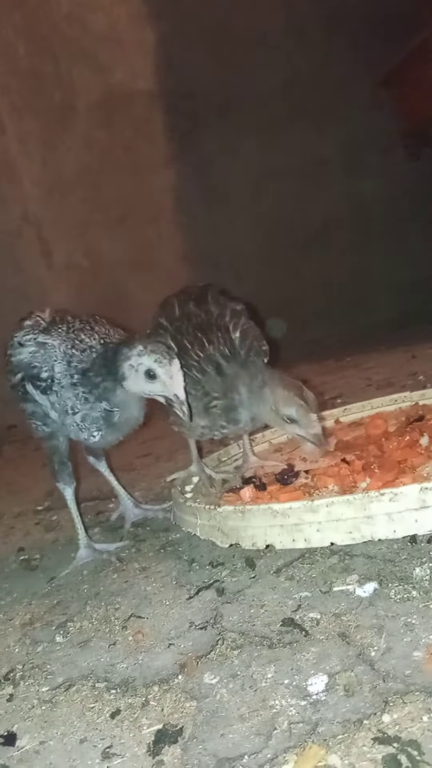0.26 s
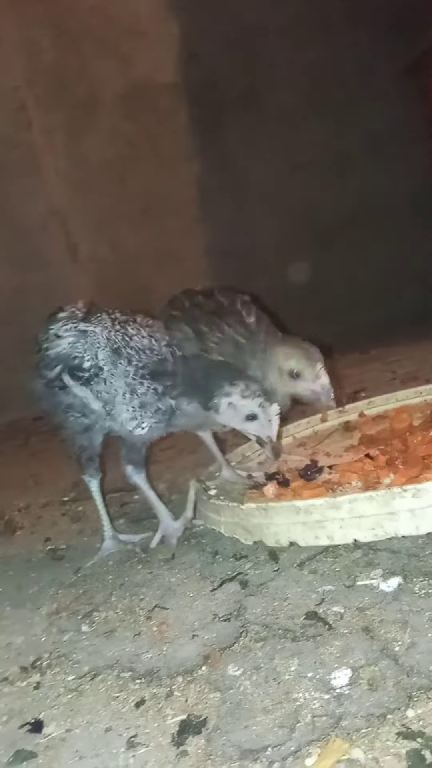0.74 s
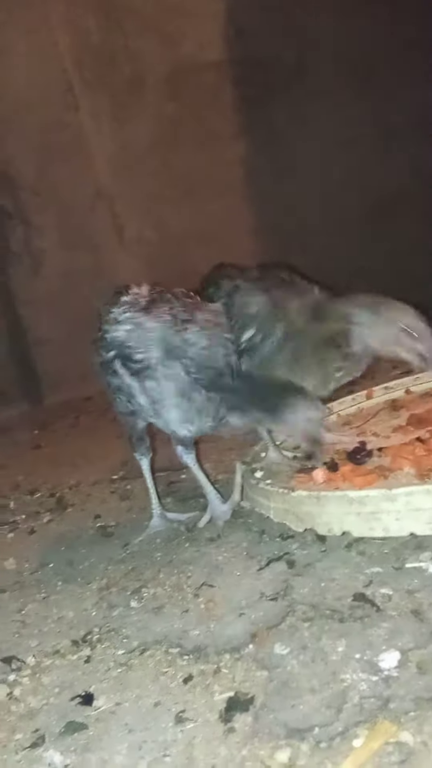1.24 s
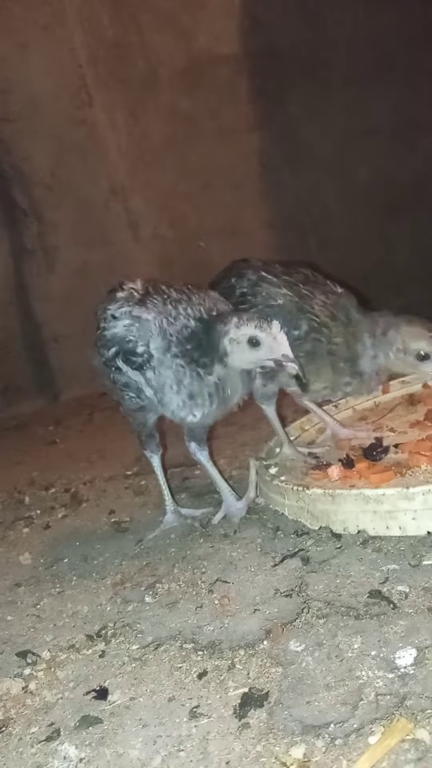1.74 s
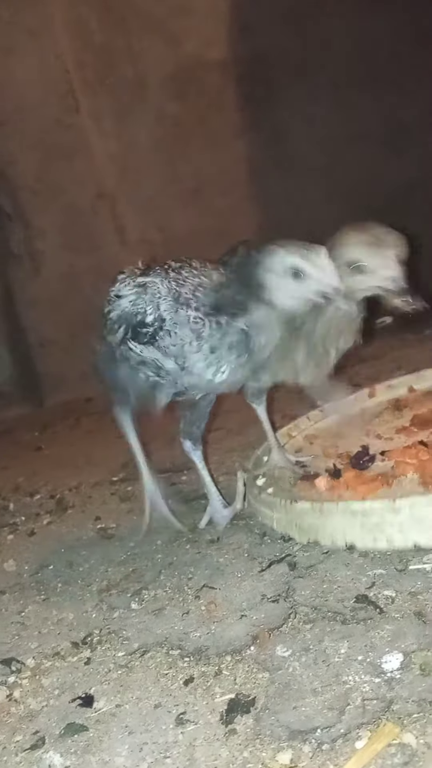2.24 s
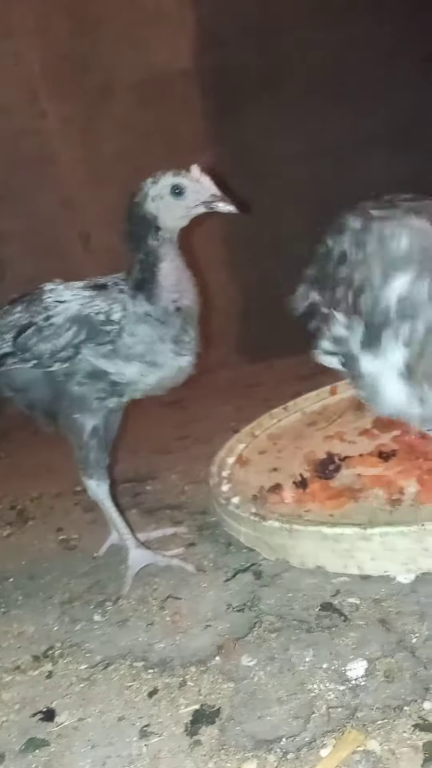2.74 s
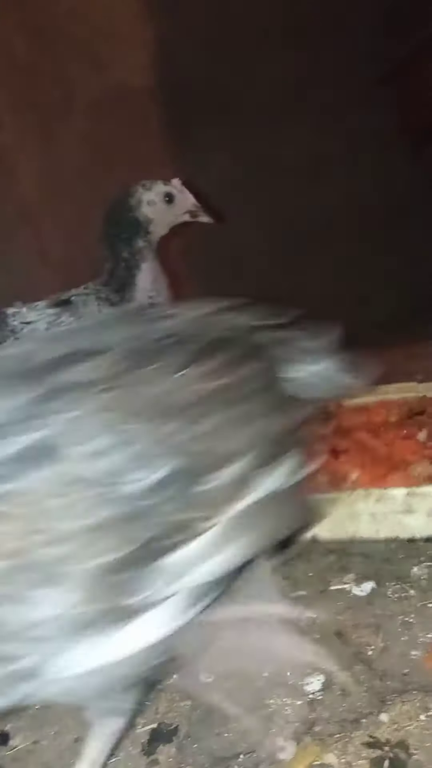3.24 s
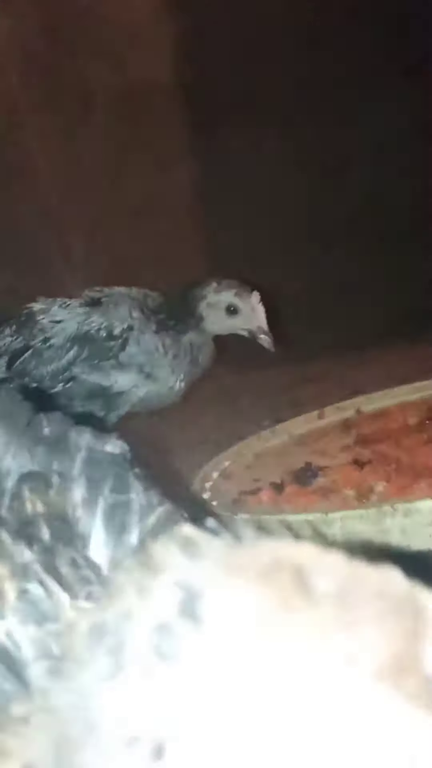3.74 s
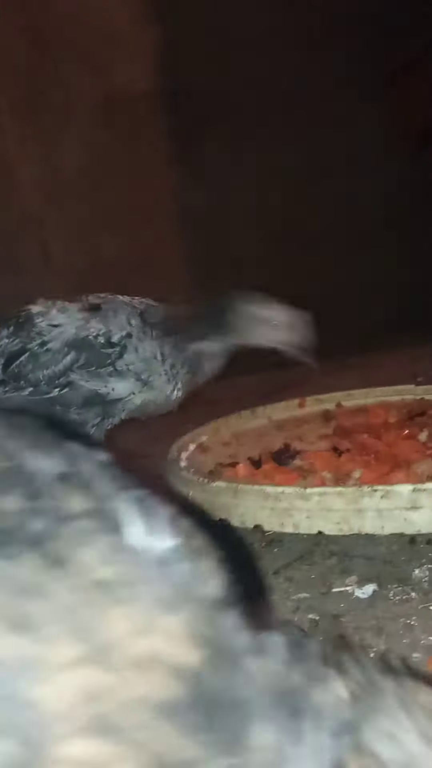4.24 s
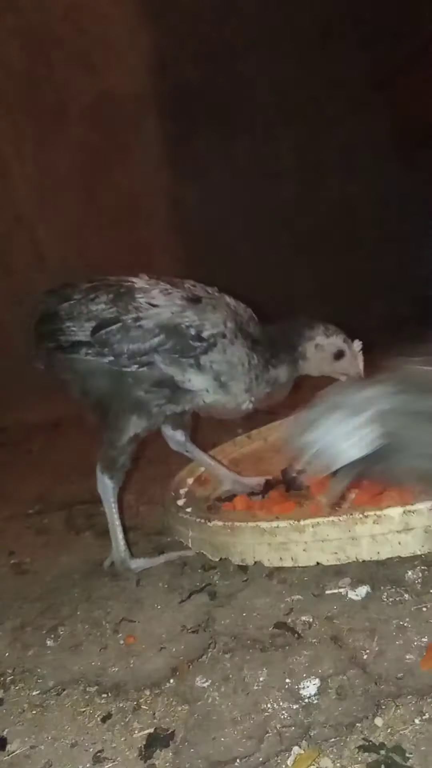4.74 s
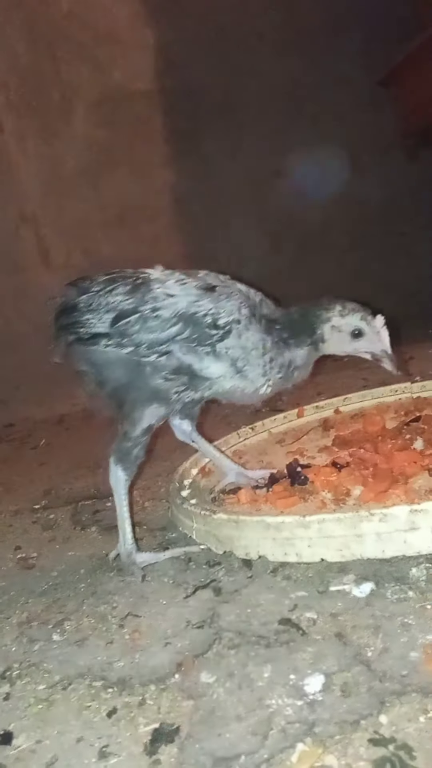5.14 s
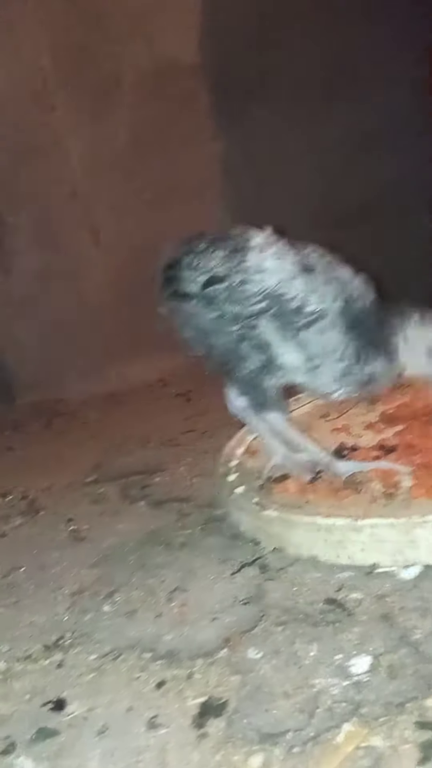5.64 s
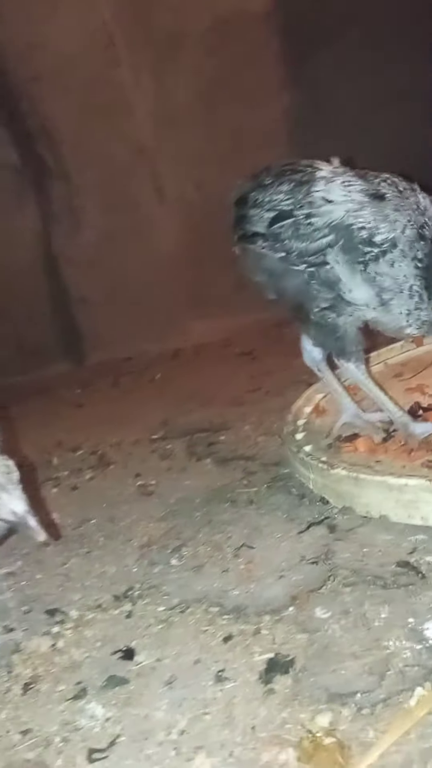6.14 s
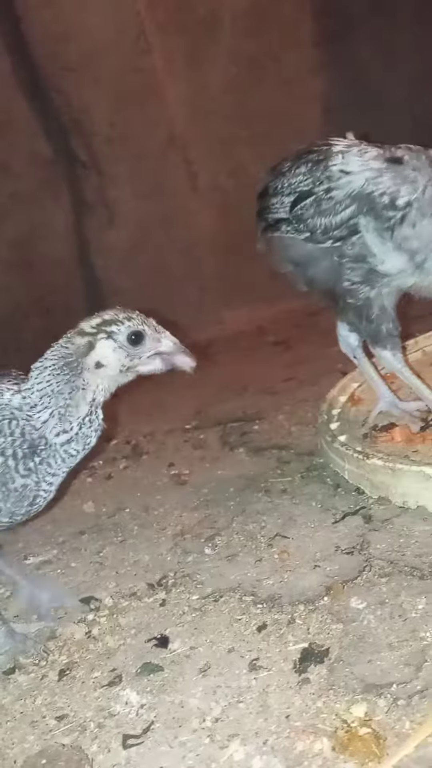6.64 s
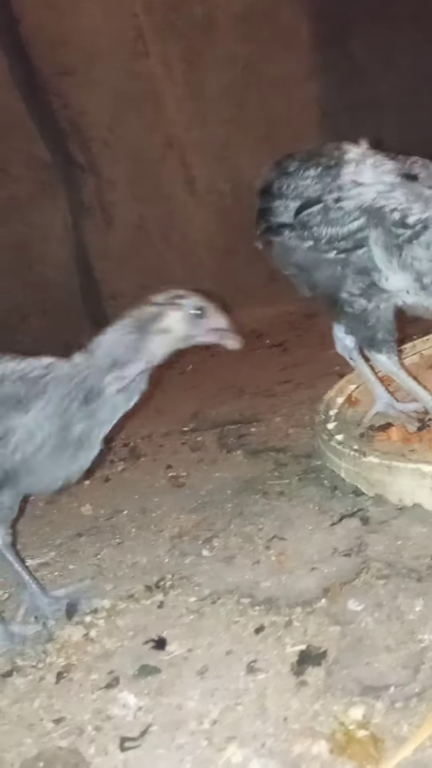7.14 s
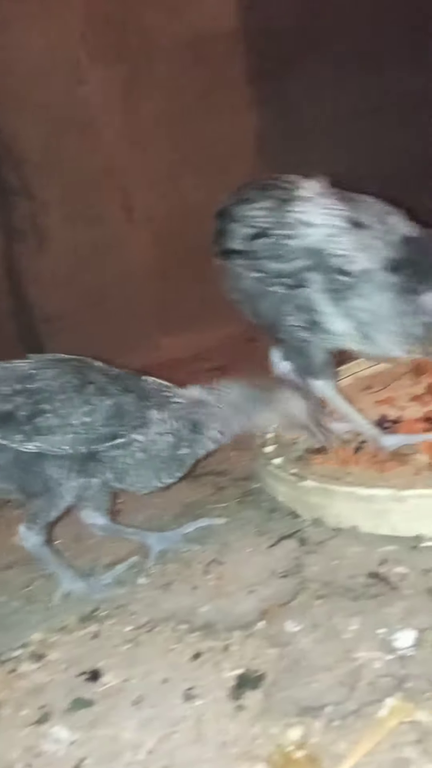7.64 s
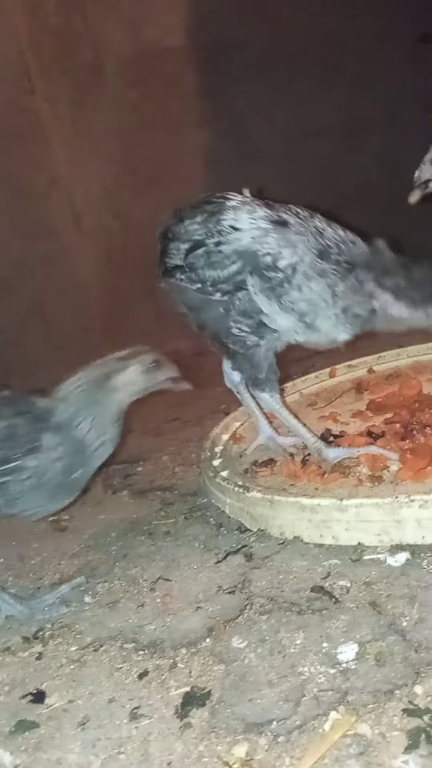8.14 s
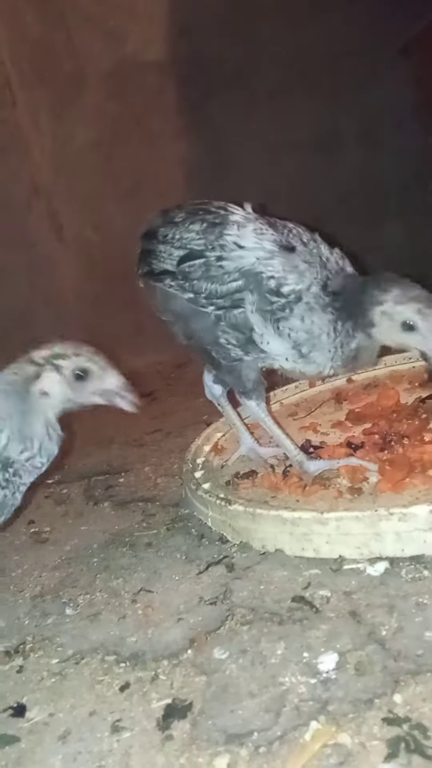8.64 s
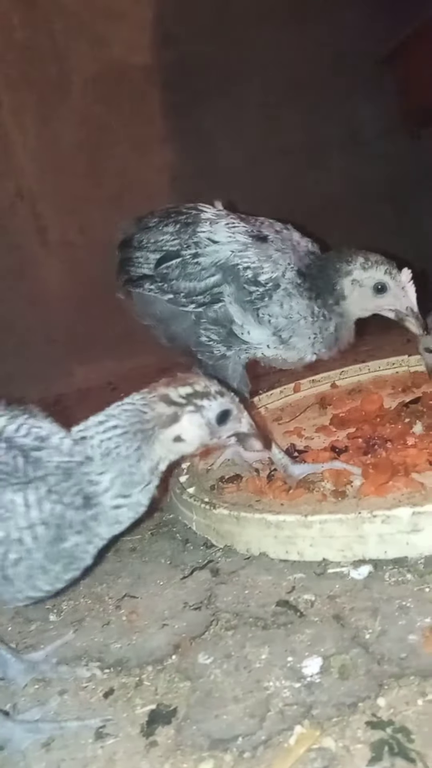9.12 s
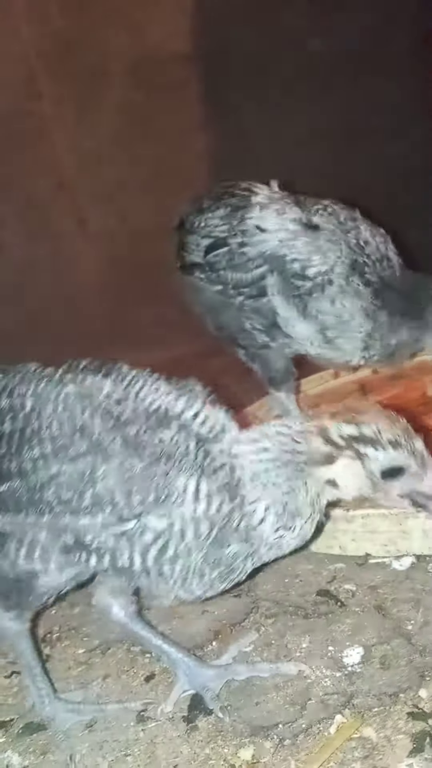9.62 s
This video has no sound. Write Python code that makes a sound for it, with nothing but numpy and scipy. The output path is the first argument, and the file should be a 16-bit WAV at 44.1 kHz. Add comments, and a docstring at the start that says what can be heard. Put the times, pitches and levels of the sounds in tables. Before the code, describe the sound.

Young chicks peep in short falling chirps and low sliding whistles while beaks and feet knock and scuff around a feed dish in a small coop.

```python
"""Faint air noise and patter open the scene, with soft scuffing, a sliding whistle and chicks' falling peeps.
Young chicks feed from a dish in a small bare coop; near and farther birds whistle mostly low, sliding notes.
Calls are phase-modulated sines with weak overtones; knocks are damped resonances plus noise cracks.
Grit ticks are short noise bursts; scuffs and rustles are random grains. A low hum comes and goes, two
squawks rasp, and close walls echo all but the hum and air."""
import sys
import numpy as np
from scipy import signal
from scipy.fft import rfft, irfft, next_fast_len
from scipy.io import wavfile

SR = 44100
rng = np.random.default_rng(int(sys.argv[2]) if len(sys.argv) > 2 else 0)


def output_pcm(signal):
    """Save a mono or channel-first signal as 16-bit PCM at the path in sys.argv[1].

    Samples are clipped to [-1, 1] before scaling.
    """
    pcm = np.clip(np.atleast_2d(signal).T, -1, 1) * 32767
    wavfile.write(sys.argv[1], SR, np.round(pcm).astype(np.int16))


N = 435708


def from_db(db):
    """Decibels to gain."""
    return 10 ** (np.asarray(db) / 20)


def rms_one(x):
    """Scale to unit power."""
    return x / np.sqrt(np.mean(x ** 2) + 1e-20)


def at_hz(points, hz):
    """Read a (Hz, value) curve on a log-frequency axis."""
    point_hz, values = np.transpose(points)
    return np.interp(np.log(hz), np.log(point_hz), values)


def add(out, start_s, sound):
    """Mix a sound in at start_s, cut at the end."""
    i = max(int(start_s * SR), 0)
    out[i:i + len(sound)] += sound[:max(N - i, 0)]


def drift(rate_hz, size):
    """Zero-mean random curve: unit-spread normal points at rate_hz, joined by straight lines."""
    steps = np.arange(size) * rate_hz / SR
    return np.interp(steps, np.arange(size), rng.standard_normal(size))


def band(x, low_hz, high_hz, order=2):
    """Causal band-pass."""
    sos = signal.butter(order, [low_hz, high_hz], "band", fs=SR, output="sos")
    return signal.sosfilt(sos, x)


def colour(x, spectrum):
    """Give a noise a spectrum; unit power."""
    size = next_fast_len(N)
    hz = np.arange(size // 2 + 1) * SR / size + 1
    shaped = rfft(x, size) * from_db(at_hz(spectrum, hz))
    return rms_one(irfft(shaped, size)[:N])


def ring(t, hz, t60_s):
    """A struck, damped resonance."""
    return np.sin(2 * np.pi * hz * t) * from_db(-60 * t / t60_s)


def note(hz, level_db, swell_db, waver, flutter_db, attack_s, release_s):
    """Phase and loudness of one syrinx note: pitch wavers, level flutters and swells or fades."""
    size = len(hz)
    t = np.arange(size) / SR
    phase = 2 * np.pi * np.cumsum(hz * (1 + waver * drift(220, size))) / SR
    gate = np.sin(np.pi / 2 * np.clip(np.minimum(t / attack_s, t[::-1] / release_s), 0, 1))
    swell = swell_db * np.interp(t / t[-1], [.3, .8], [-.5, .5])
    return phase, gate * from_db(level_db + swell + flutter_db * drift(120, size))


ORDINARY_DB, NEAR_DRYNESS_DB_PER_DB = -52, 0.75


def wall_share(level_db):
    """Calls louder than ordinary come from closer by, so less reaches the walls."""
    return from_db(-NEAR_DRYNESS_DB_PER_DB * max(level_db - ORDINARY_DB, 0))


# background air spectrum: (frequency [Hz], relative level [dB])
AIR_SPECTRUM = [(20, -16), (55, 6.5), (90, 6), (200, 0.5), (600, -5.5), (1400, -11.5), (3000, -19),
                (6000, -22.5), (10000, -18), (16000, -31)]
AIR_DB = -85


def air():
    """Steady noise, strongest in the bass."""
    return from_db(AIR_DB) * colour(rng.standard_normal(N), AIR_SPECTRUM)


def grains(per_s, spread_db, smooth):
    """Random contacts of uneven size over a rubbing hiss; each octave swells and fades by itself."""
    size_db = spread_db * np.minimum(rng.exponential(1, N), 3)
    sizes = from_db(size_db) * rng.choice([-1, 1], N)
    hits = rng.random(N) < per_s / SR
    contacts = rms_one(sizes * hits) + smooth * rng.standard_normal(N)
    total = np.zeros(N)
    for low_hz in 70 * 2 ** np.arange(8):
        total += band(contacts, low_hz, 2 * low_hz, order=1) * from_db(4 * drift(50, N))
    return total * from_db(3 * drift(70, N))


# colour of feet on the floor: (frequency [Hz], relative level [dB])
SCUFF_SPECTRUM = [(60, -16), (130, -2), (300, -11), (480, 2.5), (800, -4.5), (1300, -4.5), (2400, -1),
                  (4000, -27), (9000, -42)]
# colour of feathers and loose feed: (frequency [Hz], relative level [dB])
RUSTLE_SPECTRUM = [(500, -30.5), (1500, -20), (2400, -14), (4500, -8.5), (6200, -8), (9300, -12.5),
                   (13000, -20), (16000, -20)]


def patter():
    """Other birds step and nibble all the while: sparse grains, heard only off the walls."""
    steps = from_db(-85) * colour(grains(9, 3, smooth=0), SCUFF_SPECTRUM)
    nibbles = from_db(-83) * colour(grains(29, 7.0, smooth=0), RUSTLE_SPECTRUM)
    return steps + nibbles


# bouts of scrabbling: (time [s], length [s], foot scuff level [dB], feather and feed rustle level [dB])
SCRABBLE_BOUTS = [(0.01, 0.24, -76.5, -79), (0.531, 0.15, -66, -67.5), (1.234, 0.038, -59.5, -68),
                  (1.599, 0.15, -76, -70), (2.256, 0.25, -59, -71.5), (2.476, 0.04, -56, -76),
                  (2.592, 0.073, -64, -69), (2.69, 0.22, -70, -77), (2.886, 0.22, -64.5, -71),
                  (3.151, 0.42, -72.5, -77), (4.005, 0.19, -73, -104), (4.33, 0.068, -57, -51.5),
                  (4.444, 0.11, -57.5, -58.5), (4.546, 0.069, -58, -74), (4.756, 0.18, -86, -76),
                  (5.24, 0.41, -74.5, -81.5), (8.875, 0.12, -87, -74.5), (9.685, 0.18, -78.5, -81)]


def scrabble():
    """Feet scuff the floor while feathers and loose feed rustle: gated, coloured grains."""
    scuff, rustle = np.zeros(N), np.zeros(N)
    for start_s, length_s, scuff_db, rustle_db in SCRABBLE_BOUTS:
        stroke = signal.windows.tukey(int(length_s * SR), .5)
        add(scuff, start_s, stroke * from_db(scuff_db))
        add(rustle, start_s, stroke * from_db(rustle_db))
    feet = colour(grains(240, 3.5, smooth=0.75), SCUFF_SPECTRUM)
    feathers = colour(grains(370, 2.2, smooth=.7), RUSTLE_SPECTRUM)
    return scuff * feet + rustle * feathers


# sliding whistles: (time [s], length [s], first pitch [Hz], last pitch [Hz], level before the mix [dB])
WHISTLE_NOTES = [(0.056, 0.04, 3150, 3950, -62), (2.763, 0.023, 3735, 4200, -44),
                 (3.271, 0.079, 2657, 1946, -36), (3.729, 0.02, 2370, 2350, -55),
                 (4.935, 0.086, 2445, 1894, -53), (5.626, 0.11, 2450, 2117, -59.5),
                 (5.7, 0.16, 2094, 2250, -51), (5.956, 0.15, 1881, 2323, -56.5),
                 (6.524, 0.055, 2995, 3830, -60.5), (7.1, 0.092, 2970, 2022, -52.5),
                 (7.315, 0.081, 2696, 2150, -57.5), (7.428, 0.14, 2026, 2177, -54.5),
                 (7.587, 0.154, 2130, 2064, -55.5), (7.828, 0.088, 2084, 2233, -50.5),
                 (7.977, 0.097, 1693, 2030, -52), (8.157, 0.12, 1824, 2086, -57.5),
                 (8.322, 0.11, 1765, 2250, -52.5), (8.533, 0.12, 1673, 1938, -51.5),
                 (8.755, 0.14, 1746, 1862, -55), (8.986, 0.096, 1953, 2038, -51),
                 (9.246, 0.13, 1719, 1916, -50), (9.351, 0.13, 1918, 2159, -52.5),
                 (9.484, 0.13, 1948, 2117, -52.5), (9.742, 0.19, 1983, 2105, -46.5)]
WHISTLE_EASE_POWER, WHISTLE_SWELL_DB, WHISTLE_OCTAVE_DB = 1.9, 1, -30.5
RASP_RAD, RASP_DECAY_S = 0.55, 0.016


def whistles():
    """Notes start with a rasp, clear and ease into their last pitch. Returns direct, to walls."""
    direct, to_walls = np.zeros(N), np.zeros(N)
    for start_s, length_s, first_hz, last_hz, level_db in WHISTLE_NOTES:
        t = np.arange(int(length_s * SR)) / SR
        hz = last_hz + (first_hz - last_hz) * (1 - t / length_s) ** WHISTLE_EASE_POWER
        phase, loud = note(hz, level_db, WHISTLE_SWELL_DB, waver=0.021, flutter_db=2.2,
                           attack_s=0.02, release_s=0.0087)
        phase = phase + RASP_RAD * np.exp(-t / RASP_DECAY_S) * drift(800, len(t))
        octave = from_db(WHISTLE_OCTAVE_DB) * np.sin(2 * phase)
        whistle = loud * (np.sin(phase) + octave)
        add(direct, start_s, whistle)
        add(to_walls, start_s, whistle * wall_share(level_db))
    return direct, to_walls


# peeps: (time [s], length [s], top pitch [Hz], level [dB], swell over the note [dB],
#         relative trill depth [1])
PEEP_NOTES = [(0.107, 0.11, 3760, -55.5, 2, 0.23), (0.107, 0.051, 4070, -46.5, -4, 0.027),
              (0.26, 0.08, 3710, -48, 3, 0.15), (0.489, 0.077, 3893, -49, -9.5, 0.11),
              (0.697, 0.09, 3734, -49.5, -12.5, 0.28), (0.932, 0.12, 3813, -48.5, -9.5, 0.11),
              (1.001, 0.094, 4066, -43.5, -1.5, 0.11), (1.211, 0.11, 4094, -48, -14, 0.017),
              (1.877, 0.089, 3460, -69.5, 9, 0.21), (2.09, 0.08, 3573, -64, -16.5, 0.23),
              (2.303, 0.014, 3950, -50, -27, 0.0071), (2.393, 0.19, 3560, -56, 0, 0.23),
              (2.531, 0.077, 3685, -49.5, -11.5, 0.082), (2.774, 0.026, 4360, -48, -3, 0),
              (3.231, 0.044, 3710, -42.5, 8.5, 0.057), (3.351, 0.045, 3880, -44, -12.5, .22),
              (3.512, 0.041, 3664, -43, 12, 0.27), (3.713, 0.011, 3220, -39, -4, 0.13),
              (4.113, 0.085, 3426, -59, 4.5, 0.17), (4.877, 0.066, 3620, -57, 11.5, 0.025),
              (5.234, 0.098, 3754, -54.5, -9, 0.41), (5.422, 0.12, 3613, -52.5, -12, 0.36),
              (6.209, 0.093, 3690, -50.5, -5, 0.2), (6.331, 0.065, 4000, -39.5, 9.5, .16),
              (6.585, 0.14, 3647, -48, -6, 0.48), (6.778, 0.16, 3620, -53.5, -2.5, 0.33),
              (6.833, 0.1, 3980, -45, -2.5, 0), (6.872, 0.086, 3884, -48, 9, 0.47),
              (7.07, 0.04, 3520, -55.5, 0, 0.01), (7.427, 0.1, 4016, -57, -9.5, .05),
              (7.71, 0.066, 3660, -55.5, 15.5, 0.36), (8.056, 0.12, 3740, -55, -0.5, 0.42),
              (8.163, 0.1, 3690, -50.5, -3.5, 0.31), (8.197, 0.11, 4160, -48.5, 3, 0.16),
              (8.291, 0.12, 3666, -53, -10, 0.12), (8.396, 0.1, 4150, -47.5, -2.5, .06),
              (8.643, 0.081, 4070, -36.5, -11.5, 0), (9.092, 0.125, 3840, -54, 9.5, 0.4),
              (9.194, 0.14, 3746, -52, -8.5, 0.41), (9.302, 0.12, 3740, -50.5, -4, 0.12)]
# octave overtone of a peep at ORDINARY_DB: (time [s], level [dB])
OCTAVE_LEVEL = [(0.3, -84.5), (2.5, -78.5), (6.2, -83.5), (6.8, -72), (8.2, -77.5), (9.3, -72)]
PEEP_END_HZ, SCOOP_SHARE, SCOOP_DECAY_S = 2902, .07, .005
CLEAR_ARCH_POWER, TRILL_FLATTENS = 2.35, 0.49   # trill depth that cuts the power by e
TRILL_HZ, TRILL_JERK, TRILL_THROB = 226.8, 1.15, 0.18   # mean rate; phase and level depth factors
PEEP_ATTACK_S, PEEP_RELEASE_S = 0.015, 0.019
OCTAVE_FOLLOWS_DB_PER_DB, OCTAVE_FLICKER_DB = 0.35, 4
TWELFTH_DB = -17.5   # third harmonic relative to the octave


def peeps():
    """Near-pure falling glides; a trill jerks pitch and level together. Returns direct, to walls."""
    direct, to_walls = np.zeros(N), np.zeros(N)
    octave_s, octave_level_db = np.transpose(OCTAVE_LEVEL)
    for start_s, length_s, top_hz, level_db, swell_db, trill in PEEP_NOTES:
        t = np.arange(int(length_s * SR)) / SR
        u = t / length_s
        # clear peeps scoop up and arch; trilled ones drop at once
        clear = np.exp(-abs(trill) / TRILL_FLATTENS)
        hz = top_hz + (PEEP_END_HZ - top_hz) * u ** (CLEAR_ARCH_POWER * clear)
        hz = hz * (1 - SCOOP_SHARE * clear * np.exp(-t / SCOOP_DECAY_S))
        phase, loud = note(hz, level_db, swell_db, waver=0.0077, flutter_db=2.62,
                           attack_s=PEEP_ATTACK_S, release_s=PEEP_RELEASE_S)

        trill_hz = TRILL_HZ * (1 + .2 * drift(110, len(t)))
        turn = np.exp(2j * np.pi * np.cumsum(trill_hz) / SR)
        jerk = trill * (turn + turn ** 2 / 2 + turn ** 3 / 4)
        jerk = jerk * (1.25 - u)   # the trill calms as the note falls
        phase = phase + TRILL_JERK * jerk.imag
        throb = 1 + TRILL_THROB * jerk.real

        octave_db = np.interp(start_s, octave_s, octave_level_db)
        octave_db = octave_db + OCTAVE_FOLLOWS_DB_PER_DB * (level_db - ORDINARY_DB)
        relative_db = octave_db - level_db + OCTAVE_FLICKER_DB * drift(70, len(t))
        third = from_db(TWELFTH_DB) * np.sin(3 * phase)
        overtones = from_db(relative_db) * (np.sin(2 * phase) + third)
        peep = loud * throb * (np.sin(phase) + overtones)
        add(direct, start_s, peep)
        add(to_walls, start_s, peep * wall_share(level_db))
    return direct, to_walls


# beak and claw ticks on grit: (time [s], level [dB], sparkle relative to it before a fixed lift [dB])
GRIT_TICKS = [(0.1804, -55.5, -24), (0.3374, -35, -5), (0.5637, -47, -28), (0.8859, -41.5, -19),
              (1.3238, -50.5, -18), (1.6241, -44, -8), (2.304, -43, -16), (2.4338, -40, -24.5),
              (2.501, -33, -22), (2.5277, -41, -12), (2.7187, -46, -23), (2.773, -44, -22),
              (2.898, -41.5, -20), (3.0415, -49.5, -31), (3.2987, -46, -27), (3.367, -54, -15),
              (3.3737, -52, -10), (3.9525, -42, -14), (3.9596, -35, -28), (4.2972, -45.5, -26),
              (4.3428, -30, -33.5), (4.368, -35.5, -25), (4.392, -38.5, -18), (4.567, -34.5, -25.5),
              (4.5811, -34, -35.5), (4.6421, -23.5, -14), (4.648, -29.5, -9.5), (4.657, -43, -53),
              (5.187, -52, -27), (5.3339, -35, -19), (5.348, -35.5, -18), (7.213, -50.5, -25),
              (8.267, -48.5, -10), (8.884, -54, -7), (9.416, -46, -21)]
TICK_ATTACK_S, TICK_T60_S, SPARKLE_LIFT_DB = 0.0011, 0.017, 10.5


def ticks():
    """Hard tips crush grit: a sharp, crackling noise burst that dies quickly."""
    out, t = np.zeros(N), np.arange(SR // 5) / SR
    for start_s, level_db, sparkle_db in GRIT_TICKS:
        envelope_db = 3.5 * drift(900, len(t)) - 60 * t / TICK_T60_S
        crunch = rng.standard_normal(len(t)) * from_db(envelope_db)
        crunch = crunch * np.clip(t / TICK_ATTACK_S, 0, 1)
        sparkle = from_db(sparkle_db + SPARKLE_LIFT_DB) * band(crunch, 13500, 17500)
        add(out, start_s, from_db(level_db) * (band(crunch, 1800, 9000) + sparkle))
    return out


# faint hums: (time [s], length [s], level [dB])
HUM_SPELLS = [(0.4, 0.7, -76.5), (4.6, 1.32, -76), (7.5, 0.4, -80.5)]
HUM_LOW_HZ, HUM_HIGH_HZ = 72, 92


def hum():
    """A narrow noise band, heard as a wavering drone that fades in and out."""
    level = np.zeros(N)
    for start_s, length_s, level_db in HUM_SPELLS:
        fade = signal.windows.tukey(int(length_s * SR), .5)
        add(level, start_s, from_db(level_db) * fade)
    return level * rms_one(band(rng.standard_normal(N), HUM_LOW_HZ, HUM_HIGH_HZ))


FLOOR_MEAN_HZ = 186.4
HARD_THUMP_LOSS_DB = 36   # soft, heavy blows shake the floor most


def blow(hz, hardness, thump_db):
    """One dead swing of the dish, a low floor thump and, the harder the blow, a short crack."""
    t = np.arange(SR // 5) / SR
    swing = band(ring(t, hz, 0.0068), 470, 4600)
    floor_hz = FLOOR_MEAN_HZ * (1 + .08 * rng.standard_normal())
    floor = ring(t, floor_hz, 0.079) + from_db(-5) * ring(t, 1.4 * floor_hz, 0.068)
    thump = band(floor, 99, 900, order=1)
    crack = band(rng.standard_normal(len(t)), 900, 3000) * np.exp(-t / 0.005)
    out = (1 - hardness) * from_db(7) * swing
    out = out + hardness * from_db(7.5) * crack
    return out + from_db(thump_db - HARD_THUMP_LOSS_DB * hardness) * thump


# footfalls by the dish: (time [s], level [dB], hardness [0-1])
FOOT_BLOWS = [(0.421, -35, 0.37), (1.241, -43.5, 0.38), (1.629, -39, .16), (2.312, -31.5, 0.46),
              (2.945, -39, 0.7), (3.066, -52.5, 0.92), (3.38, -52, 0.57), (3.497, -40.5, 0.54),
              (3.7, -61, 0.3), (5.683, -60, 0.25), (6.274, -51.5, 0.6), (9.485, -45.5, 0.54),
              (9.81, -49, 0.43)]
# beak blows on the dish: (time [s], level [dB], pitch [Hz], hardness [0-1])
BEAK_BLOWS = [(0.572, -45.5, 860, 0.2), (0.723, -48.5, 870, 0.14), (0.887, -30.5, 1055, 0.16),
              (2.515, -29.5, 980, 0.41), (2.666, -43, 1010, 0.55), (2.788, -37.5, 463, 0.35),
              (3.289, -36, 724, 0.44), (3.643, -48, 1750, 0.16), (3.686, -47, 750, 0.15),
              (4.346, -29, 920, 0.6), (4.463, -32.5, 840, 0.02), (4.581, -33.5, 880, 0.83),
              (4.664, -39, 1430, 0.35), (4.726, -43.5, 744, 0.37), (4.816, -46.5, 1480, 0.96),
              (4.855, -46, 930, 0.52), (5.064, -48, 1350, 0.62), (5.33, -41, 1000, 0.54),
              (5.348, -51.5, 880, 0.5), (5.464, -43, 760, 0.02), (6.954, -52, 1250, 1),
              (7.623, -35.5, 944, 0.19), (7.644, -40.5, 726, 0.53), (7.864, -52.5, 925, 0.73)]
FOOT_KNOCK_HZ, FOOT_THUMP_DB, PECK_THUMP_DB = 694, 4.5, -17.5


def knocks():
    """Heavier feet and light beaks strike the dish and the floor."""
    out = np.zeros(N)
    for start_s, level_db, hardness in FOOT_BLOWS:
        add(out, start_s, from_db(level_db) * blow(FOOT_KNOCK_HZ, hardness, FOOT_THUMP_DB))
    for start_s, level_db, hz, hardness in BEAK_BLOWS:
        add(out, start_s, from_db(level_db) * blow(hz, hardness, PECK_THUMP_DB))
    return out


# hoarse squawks in a scuffle: (time [s], length [s], level [dB])
SQUAWK_CRIES = [(2.319, 0.03, -40), (2.339, 0.021, -50)]
SQUAWK_FOOT_HZ, SQUAWK_TOP_HZ, SQUAWK_ROUGH_RAD = 2060, 2830, 0.42


def squawks():
    """Short arched cries; fast random phase smears the pitch."""
    out = np.zeros(N)
    for start_s, length_s, level_db in SQUAWK_CRIES:
        arch = np.sin(np.linspace(0, np.pi, int(length_s * SR)))
        hz = SQUAWK_FOOT_HZ + (SQUAWK_TOP_HZ - SQUAWK_FOOT_HZ) * arch
        phase, loud = note(hz, level_db, swell_db=7.5, waver=0.069, flutter_db=5,
                           attack_s=0.0031, release_s=.006)
        phase = phase + SQUAWK_ROUGH_RAD * drift(1500, len(hz))
        add(out, start_s, loud * (np.sin(phase) + from_db(-19) * np.sin(2 * phase)))
    return out


# echo colour: (frequency [Hz], relative level [dB])
WALL_COLOUR = [(100, 7), (200, -18), (400, -3), (800, 3), (1300, -8.5), (2000, -4.5), (4000, -5),
               (8000, -4), (16000, -2)]
# echo decay: (frequency [Hz], T60 [s])
WALL_T60 = [(150, 0.16), (700, 0.4), (2000, 0.36), (4000, 0.26), (8000, 0.23), (14000, 0.048)]
ECHO_DB, ECHO_ONSET_S = -30.5, 0.0065


def coop(x):
    """Dense echoes off close walls: half-octave noise bands, dying fastest in the top treble."""
    t = np.arange(SR * 3 // 4) / SR
    edges_hz = 80 * 2 ** np.arange(0, 8.1, .5)
    echo = np.zeros(len(t))
    for low_hz, high_hz in zip(edges_hz, edges_hz[1:]):
        hz = np.sqrt(low_hz * high_hz)
        decay_db = at_hz(WALL_COLOUR, hz) - 60 * t / at_hz(WALL_T60, hz)
        echo += band(rng.standard_normal(len(t)), low_hz, high_hz) * from_db(decay_db)
    echo = echo * np.clip(t / ECHO_ONSET_S, 0, 1) * from_db(ECHO_DB)
    return signal.fftconvolve(x, echo)[:N]


def scene():
    """Louder calls are more direct; the whistles get an extra share of echo."""
    feet = scrabble()
    low, low_to_walls = whistles()
    high, high_to_walls = peeps()
    grit, blows, cries = ticks(), knocks(), squawks()
    to_walls = from_db(0.5) * high_to_walls + from_db(9.5) * low_to_walls
    to_walls = to_walls + from_db(-3) * cries + from_db(0.5) * blows
    to_walls = to_walls + from_db(1.0) * grit + from_db(-6.0) * feet + from_db(-4.0) * patter()
    direct = high + from_db(4.1) * low + cries + blows + grit + feet
    return (direct + coop(to_walls) + hum() + air())[None]


CUTOFF_HZ = 16100


def record(dry):
    """Steep elliptic low-pass cuts the top."""
    return signal.sosfilt(signal.ellip(10, .1, 80, CUTOFF_HZ, fs=SR, output="sos"), dry)


dry = scene()
out = record(dry)
output_pcm(out)
```